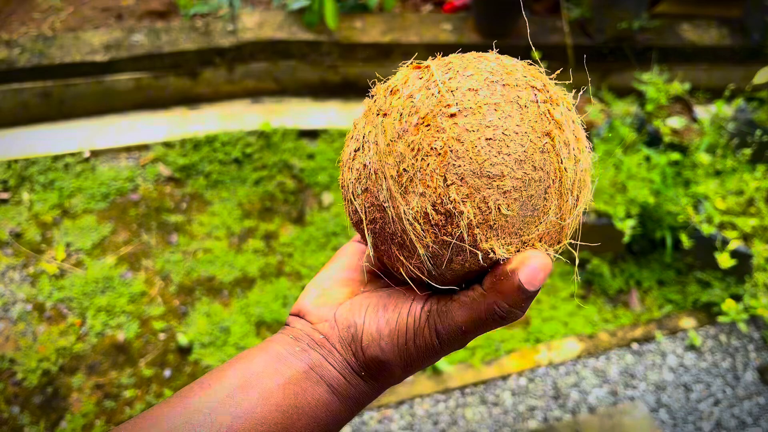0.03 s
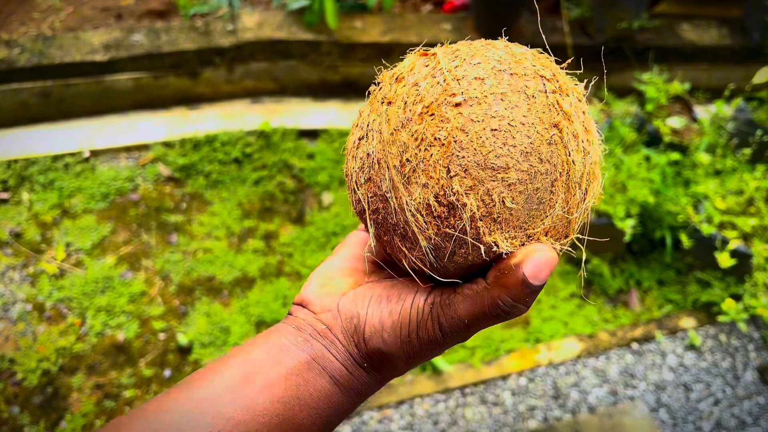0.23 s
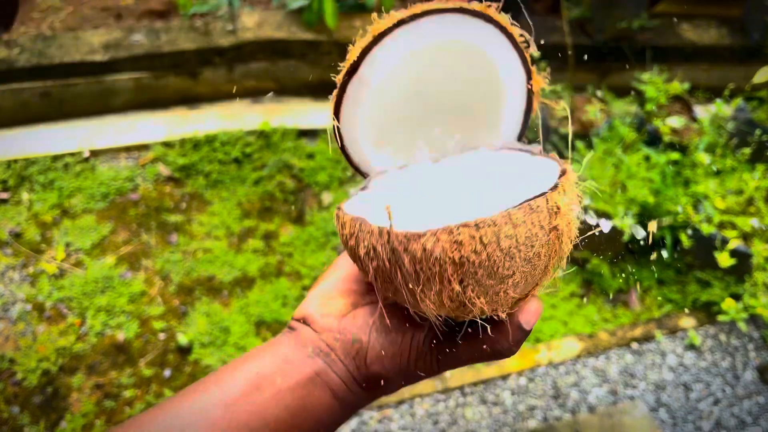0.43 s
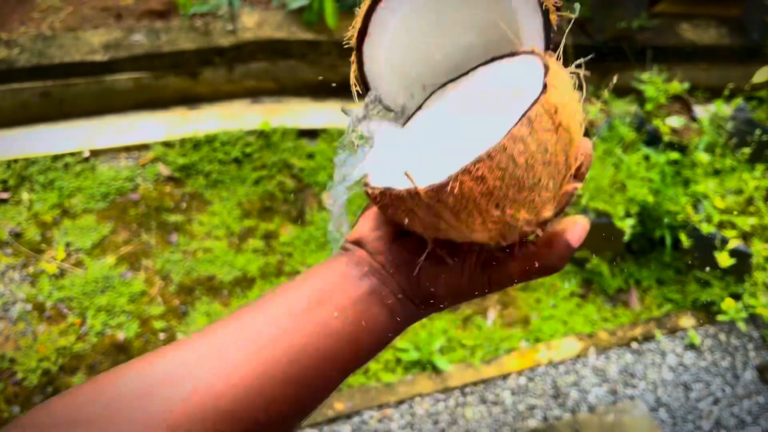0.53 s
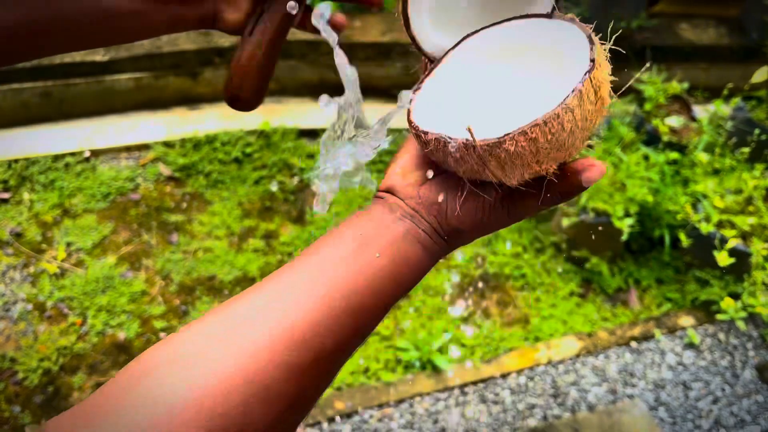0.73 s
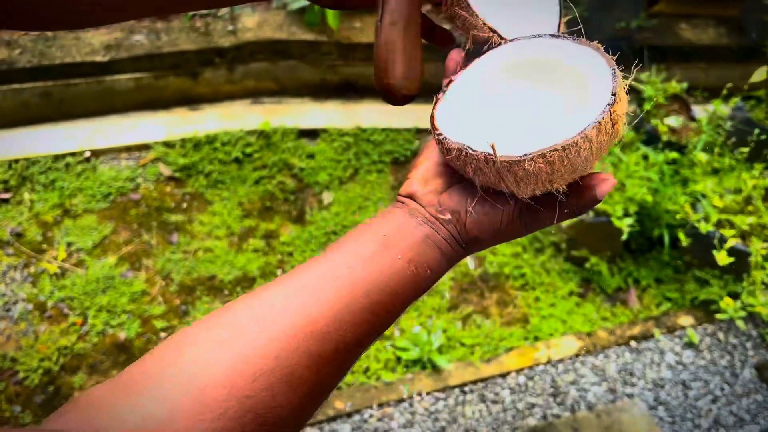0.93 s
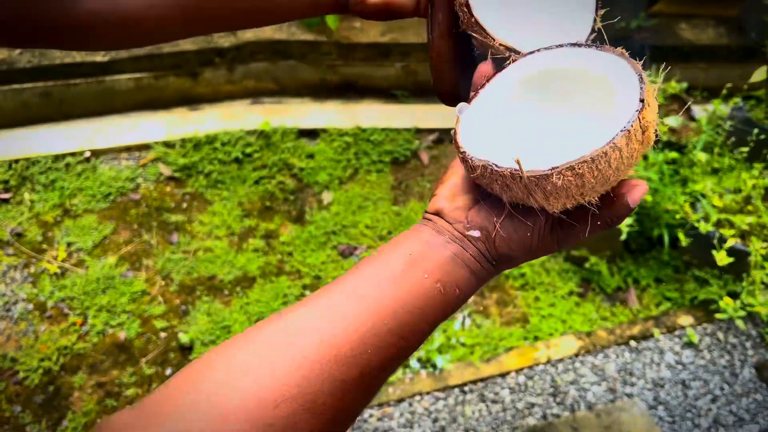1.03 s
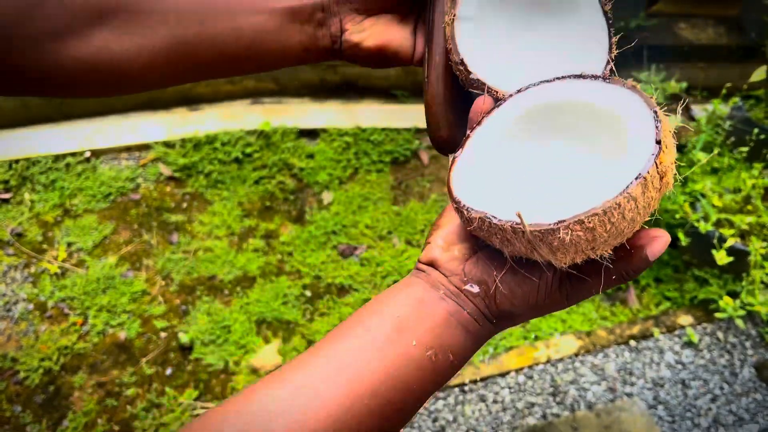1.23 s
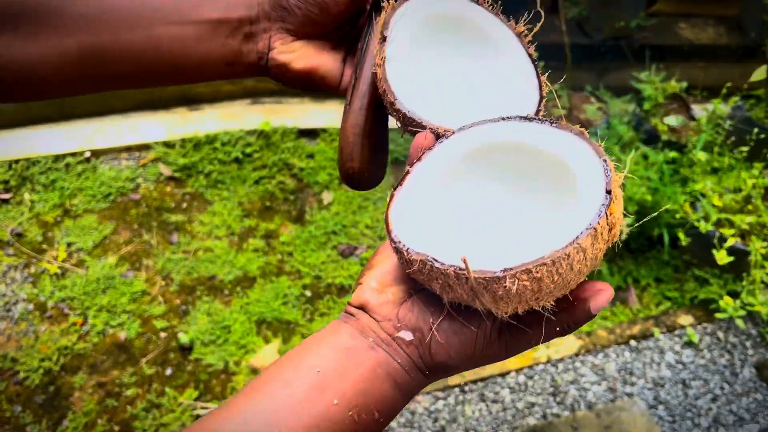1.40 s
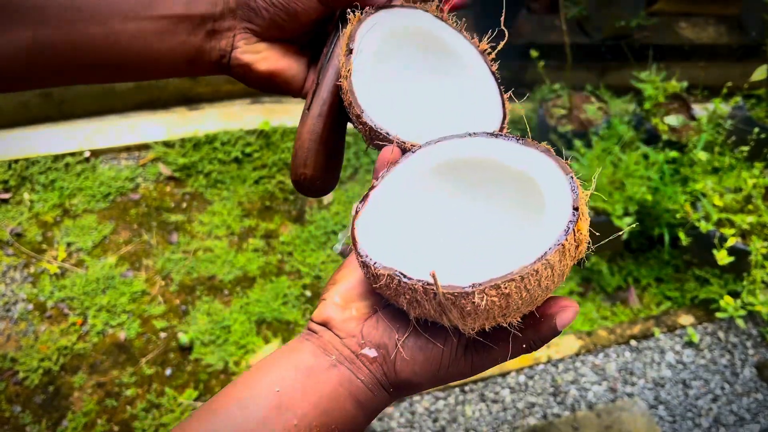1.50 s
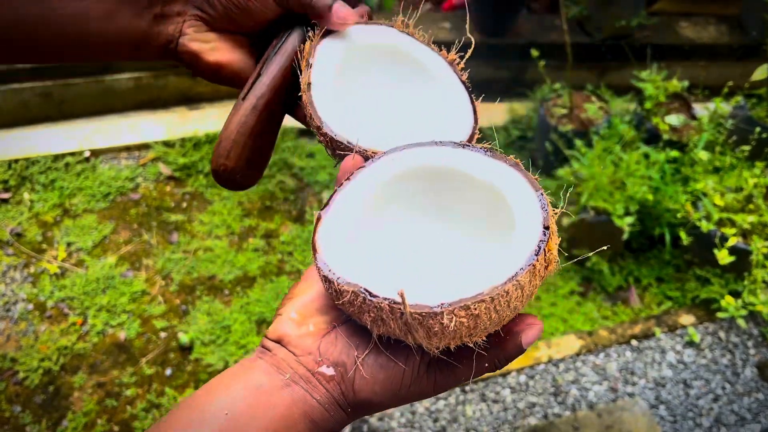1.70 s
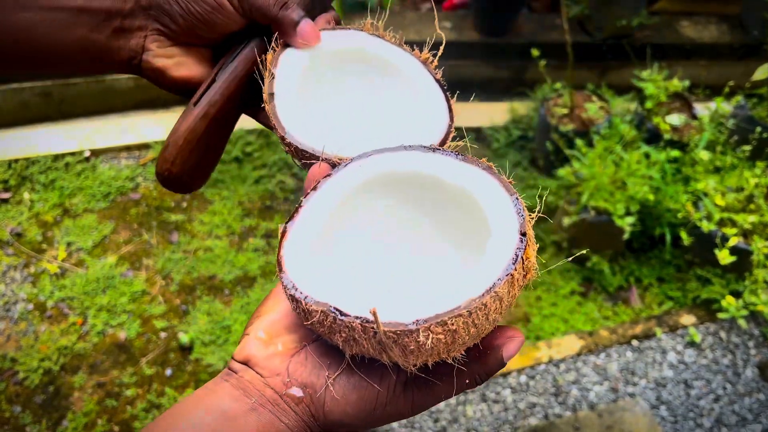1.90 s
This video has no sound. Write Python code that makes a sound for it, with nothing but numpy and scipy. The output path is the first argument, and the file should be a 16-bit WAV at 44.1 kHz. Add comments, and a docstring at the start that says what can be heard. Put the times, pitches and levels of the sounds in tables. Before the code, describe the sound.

Quiet garden air and a faint distant bird slur open the scene. At 0.22 seconds a coconut cracks very loudly: a sharp snap, splintering fibres and a hollow woody thump, with a short outdoor echo. Small wet ticks come at 0.35 to 0.5. Drops start near 0.6, with bright splashes and gurgling blips around 0.9 to 1.1, then sparse drips and soft bird chirps until about 2 seconds.

```python
"""Cracking a coconut in a garden

Over quiet outdoor air, made of filtered noise, a far bird slurs up and down with gliding tones.
A coconut is struck once: short decaying tones snap, rough bursts splinter, and the hollow nut thumps and rings.
The halves part with a few wet ticks, then drops and splashes land, made of short bursts and clouds of clicks.
The garden answers with fading noise, and a close pair of microphone ports hears it all."""
import sys
import numpy as np
from scipy import signal
from scipy.fft import rfft, irfft, next_fast_len
from scipy.io import wavfile
from scipy.ndimage import uniform_filter1d

SR = 44100
rng = np.random.default_rng(int(sys.argv[2]) if len(sys.argv) > 2 else 0)


def waveform_to_disk(signal):
    """Save audio, clipped to [-1, 1], as 16-bit WAV at the path in sys.argv[1]."""
    frames = np.transpose(np.atleast_2d(signal))
    scaled = np.clip(frames, -1, 1) * 32767
    samples = np.round(scaled).astype(np.int16)
    wavfile.write(sys.argv[1], SR, samples)


N = 85995  # length in samples
T, HZ = np.arange(N) / SR, np.fft.rfftfreq(N, 1 / SR)


def amp(db):
    """Turns decibels into gain."""
    return 10 ** (np.asarray(db) / 20)


def unit(x):
    """Scales to rms 1."""
    return x / np.sqrt(np.mean(x ** 2) + 1e-20)


def read(points, hz):
    """Reads a table between its points on a log-frequency axis."""
    f, value = np.transpose(points)
    return np.interp(np.log(hz + 1), np.log(f + 1), value)


def add(mix, s, sound):
    """Mixes a stereo sound in at time s, in seconds."""
    part = mix[:, round(s * SR):][:, :sound.shape[1]]
    part += sound[:, :part.shape[1]]


def convolve(x, taps):
    """Filters channel by channel."""
    return signal.fftconvolve(np.atleast_2d(x), np.atleast_2d(taps), axes=1)[:, :N]


def colour(points, size=2048):
    """Filter taps with the given spectrum that never sound ahead of their input."""
    hz = abs(np.fft.fftfreq(size, 1 / SR))
    log_gain = np.log(amp(read(points, hz)))
    # this phase goes with the gain and puts the energy as early as possible
    spectrum = np.exp(np.conj(signal.hilbert(log_gain)))
    return np.fft.ifft(spectrum).real[:size // 2]


def ports(x, lead_ms, pan_db):
    """A sound reaches the two ports at different times and levels; positive values favour the left."""
    delay = lead_ms / 1000
    size = next_fast_len(len(x) + 4096)
    delays = np.array([[max(-delay, 0)], [max(delay, 0)]])
    late = np.exp(-2j * np.pi * np.fft.rfftfreq(size, 1 / SR) * delays)
    return irfft(rfft(x, size) * late, size)[:, :len(x)] * amp([[pan_db / 2], [-pan_db / 2]])


# How alike surrounding noise is at left and right: f/Hz, likeness (0 to 1)
LEFT_RIGHT_LIKENESS = [(60, 0.259), (280, 0.82), (640, 0.17), (1400, 0), (15000, 0.16)]


def diffuse(points):
    """Noise from all around: the two ports share part of it, by an amount that depends on pitch."""
    a, b = rfft(rng.standard_normal((2, N)))
    same = np.clip(read(LEFT_RIGHT_LIKENESS, HZ), -1, 1)
    pair = np.array([a, same * a + np.sqrt(1 - same ** 2) * b])
    return unit(irfft(pair * amp(read(points, HZ)), N))


def tail(points, t60):
    """Surrounding noise that loses 60 dB in its own time t60 in each band."""
    hz, t, z = signal.stft(diffuse(points), SR, nperseg=256)
    fade = 1000. ** (-t / read(t60, hz)[:, None])
    return signal.istft(z * fade, SR, nperseg=256)[1][:, :N]


def garden(x, t60):
    """Smears a sound into many fading reflections, with the left filter's energy set to 1."""
    taps = tail([(20, 0.003), (20000, 0)], t60) * (1 - np.exp(-T / 0.0044))
    return convolve(x, taps / np.linalg.norm(taps[0]))


def burst(db, hz, width_hz, decay_s, size=4096):
    """Fading random clicks through two equal resonators in a row, which give steep sides."""
    fade = np.exp(-T[:size] / decay_s)
    r = np.exp(-np.pi * width_hz / SR)  # pole radius
    x = rng.choice([-1., 1.], size) * fade
    for _ in range(2):
        x = signal.lfilter([1, 0, -1], [1, -2 * r * np.cos(2 * np.pi * hz / SR), r * r], x)
    return amp(db) * x * np.linalg.norm(fade) / np.linalg.norm(x)


def ragged(x, depth_db):
    """Makes the level flutter in random patches of time and pitch."""
    z = signal.stft(x, SR, nperseg=256)[2]
    patches = rng.standard_normal(z.shape[1:])
    for axis in (0, 1):
        patches = uniform_filter1d(patches, size=5, axis=axis)
    flutter = unit(amp(depth_db * unit(patches)))
    return signal.istft(z * flutter, SR, nperseg=256)[1][:, :N]


# Tone balance of the outdoor air: f/Hz, relative level/dB per Hz
AIR_SPECTRUM = [(20, -20), (50, 2), (90, -6.5), (300, -10.5), (700, -16.5), (1600, -20.5), (4500, -16),
                (5700, -23), (7000, -19.5), (8200, -24.5), (13000, -27.5), (16000, -33)]
# Its overall loudness over time: t/s, level/dB
AIR_LOUDNESS = [(0, -70), (.17, -70.5), (.45, -61.5), (.73, -67), (1.1, -61), (1.4, -65.5), (1.7, -64),
                (1.95, -67)]
AIR_PATCH_DB = 1.8


def air():
    """Quiet outdoor rumble and hiss: shaped noise that is never quite steady."""
    level = amp(np.interp(T, *np.transpose(AIR_LOUDNESS)))
    return ragged(diffuse(AIR_SPECTRUM), AIR_PATCH_DB) * level


# Notes of the far bird, levels before the echo mix: t/s, length/s, start f/Hz, end f/Hz, level/dB
BIRD_NOTES = [(0.123, 0.1136, 5379, 3508, -60), (0.633, 0.0762, 2630, 4991, -61.5),
              (0.749, 0.0767, 5203, 3935, -62.5), (1.205, 0.0774, 5152, 3879, -57),
              (1.483, .08, 2336, 5211, -55.5), (1.594, 0.107, 5300, 3596, -61),
              (1.91, 0.0673, 2289, 4440, -57)]
BIRD_T60_S, BIRD_ROUGH_HZ, BIRD_DIRECT_DB = 0.73, 280, -12


def bird():
    """Quick slurs with a rough pitch, so far off that mostly their echo arrives."""
    out = np.zeros((2, N))
    waver = unit(uniform_filter1d(rng.standard_normal(N), size=24))
    for s, length, start_hz, end_hz, db in BIRD_NOTES:
        u = np.arange(0, 1, 1 / (length * SR))  # progress through the note
        hz = start_hz + (end_hz - start_hz) * u + BIRD_ROUGH_HZ * waver[:len(u)]
        swell = np.sqrt(np.abs(np.sin(np.pi * u)))
        note = amp(db) * swell * np.sin(2 * np.pi * np.cumsum(hz) / SR)
        add(out, s, ports(note, 0, 0))
    echo = garden(out, [(2000, BIRD_T60_S), (6000, BIRD_T60_S)])
    return amp(BIRD_DIRECT_DB) * out + echo


BLOW_T = T[:SR // 2]  # time within each sound of the blow
PUSH_S, PUSH_DB, PUSH_HZ, PUSH_RISE_S = 0.2, -33, 75.04, 0.0061


def push():
    """A soft low push: a deep tone swells and dies around the blow."""
    out, t = np.zeros((2, N)), BLOW_T
    swell = t / PUSH_RISE_S * np.exp(-t / PUSH_RISE_S)
    add(out, PUSH_S, ports(amp(PUSH_DB) * swell * np.sin(2 * np.pi * PUSH_HZ * t), 0, 0))
    return out


# Fractures running through the shell, levels before SNAP_DB:
# t/s, level/dB, f/Hz, decay/s, left lead/ms
FRACTURES = [(.2191, -3, 13000, .00022, -.075), (.2191, -6, 8200, .00018, -.06),
             (.2194, -12.5, 3080, .0022, .03), (.2196, -12, 3900, .0012, .04),
             (.2198, -14, 1500, .0014, .12), (.2199, -15.5, 810, .003, .15), (.2206, -12, 4500, .0005, .05)]
SNAP_DB = -3.5


def snaps():
    """Each fracture is a click with a brief ring: a tone that starts at once and dies fast."""
    out, t = np.zeros((2, N)), BLOW_T
    for s, db, hz, decay, lead in FRACTURES:
        snap = amp(db + SNAP_DB) * np.exp(-t / decay) * np.sin(2 * np.pi * hz * t)
        add(out, s, ports(snap, lead, pan_db=6))
    return out


# Splintering fibres, held back to the first fracture if earlier:
# t/s, level/dB, centre f/Hz, width f/Hz, decay/s
FIBRES = [(0.2208, -23, 15300, 5140, 0.00224), (0.2213, -21, 1580, 4900, 0.00358),
          (0.2156, -20, 2940, 900, .002), (.2196, -21, 720, 230, .004),
          (0.2122, -22.5, 6890, 4500, 0.00095)]


def grit():
    """Fibres splinter around the fractures as short rough bursts."""
    out = np.zeros((2, N))
    for s, db, hz, width, decay in FIBRES:
        add(out, max(s, FRACTURES[0][0]), ports(burst(db, hz, width, decay), 0, 0))
    return out


# Modes of the shell and its cavity, levels before RING_DB: f/Hz, level/dB
SHELL_MODES = [(174, -26), (289, -27), (337, -20), (531, -30), (685, -31), (745, -30), (914, -37),
               (1561, -41), (1991, -43), (2207, -41), (2341, -41), (2731, -42), (3113, -37), (3948, -41)]
RING_S, RING_DB, SHELL_T60_S = .2203, -1, .14
THUMP_LEAD_MS = 0.2  # shared by the ring and the thump


def shell_ring():
    """The shell and its cavity ring together at their own pitches, all dying at one speed."""
    out, t = np.zeros((2, N)), BLOW_T
    ring = sum(amp(db - 60 * t / SHELL_T60_S) * np.sin(2 * np.pi * f * t) for f, db in SHELL_MODES)
    add(out, RING_S, ports(amp(RING_DB) * ring, THUMP_LEAD_MS, -0.7))
    return out


THUMP_S, THUMP_DB, THUMP_RISE_S, THUMP_FALL_S = .2226, 6.5, 0.0014, 0.001742
THUMP_HZ, THUMP_END_HZ, SAG_S = 418.7, 150, 0.0044


def thump():
    """The hollow nut gives way: one heavy swing that sags in pitch."""
    out, t = np.zeros((2, N)), BLOW_T
    hz = THUMP_END_HZ + (THUMP_HZ - THUMP_END_HZ) * np.exp(-t / SAG_S)
    swell = (1 - np.exp(-t / THUMP_RISE_S)) * np.exp(-t / THUMP_FALL_S)
    swing = swell * np.sin(2 * np.pi * np.cumsum(hz) / SR)
    add(out, THUMP_S, ports(amp(THUMP_DB) * swing, THUMP_LEAD_MS, -.6))
    return out


ECHO_MODE_DB, ECHO_MODE_WIDTH_HZ = 8, 30


def shell_colour(x):
    """The echo carries the shell's resonances as peaks in its spectrum."""
    peaks = sum(1 / (1 + (2 * (HZ - hz) / ECHO_MODE_WIDTH_HZ) ** 2) for hz, _ in SHELL_MODES)
    return irfft(rfft(x) * amp(ECHO_MODE_DB * (peaks - np.mean(peaks))), N)


# Tone balance of the garden's first answer: f/Hz, relative level/dB per Hz
NEAR_SPECTRUM = [(30, -13.5), (130, -7), (350, -4.5), (510, 2.5), (590, -13.5), (720, -6.5), (930, -0.5),
                 (1150, -19), (2000, -13.5), (3200, -12.5), (5000, -21.5), (15000, -34)]
# Time it takes to fall 60 dB: f/Hz, t60/s
NEAR_FADE = [(100, 0.12), (14000, 0.18)]
# Tone balance of the garden's late echo: f/Hz, relative level/dB per Hz
FAR_SPECTRUM = [(40, -3.5), (120, -2.5), (260, 0), (450, 4.5), (800, -1), (1200, -15.5), (3000, -13.5),
                (7000, -23.5), (15000, -39.5)]
# Time it takes to fall 60 dB: f/Hz, t60/s
FAR_FADE = [(60, 0.547), (400, 0.3807), (1500, .45), (5000, 0.6), (14000, 0.716)]
NEAR_DB, FAR_DB, ECHO_S, ECHO_PATCH_DB = -25.5, -34.5, .229, 3


def blow_echo():
    """The garden answers the blow with two layers of fading noise that flutter."""
    out = np.zeros((2, N))
    near = amp(NEAR_DB) * tail(NEAR_SPECTRUM, NEAR_FADE)
    far = amp(FAR_DB) * tail(FAR_SPECTRUM, FAR_FADE)
    echo = ragged(shell_colour(near + far), ECHO_PATCH_DB)
    add(out, ECHO_S, echo * (1 - np.exp(-T / .002)))
    return out


# Slaps of the crack off the ground and nearby walls: delay t/s, level/dB, treble cut f/Hz
REFLECTIONS = [(0.0162, -20.5, 4426), (0.0215, -20.5, 3000)]


def wall_slaps(direct):
    """Hard surfaces send back late, weaker and duller copies of the crack."""
    out = np.zeros((2, N))
    for delay, db, cut_hz in REFLECTIONS:
        dull = signal.sosfilt(signal.butter(2, cut_hz, fs=SR, output="sos"), direct)
        add(out, delay, amp(db) * dull)
    return out


THUMP_CUT_HZ = 116.6  # bass below this is weakened


def crack():
    """The shell fractures, the nut rings and thumps, and the surroundings answer."""
    bass_cut = signal.butter(2, THUMP_CUT_HZ, "high", fs=SR, output="sos")
    direct = signal.sosfilt(bass_cut, snaps() + grit() + shell_ring() + thump())
    return push() + direct + blow_echo() + wall_slaps(direct)


# Small knocks and squelches: t/s, level/dB, centre f/Hz, width f/Hz, decay/s
PARTING_KNOCKS = [(0.347, -51, 1360, 303, 0.0092), (.361, -40.5, 7130, 5180, 0.0021),
                  (0.399, -46.5, 1155, 392, 0.00304), (0.4813, -41, 3190, 890, 0.00157),
                  (0.5057, -40.5, 3725, 4730, 0.00232), (0.5049, -42.5, 1790, 1050, 0.00493),
                  (0.505, -51.5, 586.6, 990, 0.0052), (1.743, -54.5, 1188, 914.7, 0.00327)]


def halves():
    """The wet halves knock and squelch as they come apart, in short bursts with a little echo."""
    out = np.zeros((2, N))
    for s, db, hz, width, decay in PARTING_KNOCKS:
        add(out, s, ports(burst(db, hz, width, decay), lead_ms=0.2392, pan_db=6))
    return out + amp(-11.5) * garden(out, [(300, 0.1987), (8000, 0.097)])


WATER_LEAD_MS, WATER_PAN_DB = 0.30746, 4  # the left port leads and is louder
# Single drops landing, levels before DROP_DB: t/s, level/dB
DROP_LANDINGS = [(0.599, -33.5), (0.6867, -46.5), (0.8347, -39.5), (0.8557, -43), (0.8669, -31.5),
                 (0.8859, -30), (0.8912, -38.5), (0.899, -29), (0.9138, -21.5), (0.9352, -28),
                 (0.9525, -30.5), (1.0278, -31), (1.0512, -35), (1.072, -31), (1.0831, -31.5),
                 (1.2095, -40.5), (1.4201, -46.5), (1.4639, -46), (1.4938, -44.5), (1.718, -47.5),
                 (1.8603, -35.5), (1.9464, -42)]
DROP_DB, DROP_HZ, DROP_WIDTH_HZ, DROP_DECAY_S = -7, 6520, 4640, 0.001283
# the sharper tick in each drop, its level relative to the drop's body
TICK_DB, TICK_HZ, TICK_WIDTH_HZ, TICK_DECAY_S = 2, 7801, 28700, 0.000476


def drops():
    """Each stray drop is a bright burst with a sharper tick on top."""
    out = np.zeros((2, N))
    for s, db in DROP_LANDINGS:
        body = burst(db, DROP_HZ, DROP_WIDTH_HZ, DROP_DECAY_S)
        tick = burst(db + TICK_DB, TICK_HZ, TICK_WIDTH_HZ, TICK_DECAY_S)
        add(out, s, ports(amp(DROP_DB) * (body + tick), WATER_LEAD_MS, WATER_PAN_DB))
    return out


SPRAY_PER_S, GURGLE_PER_S, GRAIN_SPREAD_DB = 2000, 700, 4.6  # grain rates are for each of three clouds


def spatter(points, level, per_s):
    """Clouds of tiny impacts of uneven size: one at each port and one that both ports hear."""
    uneven_db = GRAIN_SPREAD_DB * np.minimum(rng.exponential(1, (3, N)), 4)
    size = amp(uneven_db) * rng.choice([-1, 1], (3, N))
    left, right, centre = size * (rng.random((3, N)) < per_s / SR)
    sides = np.array([left, right]) * amp([[.8], [-.8]])
    cloud = sides + ports(centre, WATER_LEAD_MS, WATER_PAN_DB)
    taps = colour(points)
    return convolve(unit(cloud) * level, taps / np.linalg.norm(taps))


# Water hitting the ground: t/s, level/dB, rise/s, decay/s, gurgle level/dB relative to the spray
WATER_HITS = [(0.791, -55, 0.0382, 0.0234, -12), (0.884, -41.5, 0.00464, 0.0177, -12.5),
              (0.913, -41, 0.0034, 0.0271, -1), (1.011, -43.5, 0.0371, 0.0303, -3.5)]
# Tone balance of the bright spray: f/Hz, relative level/dB per Hz
SPRAY_SPECTRUM = [(200, -35.5), (1000, -9), (2500, -35.5), (4500, 4.5), (6400, 5), (8000, 3.5),
                  (10000, 1.5), (13000, -4.5), (16000, -5)]
# Tone balance of the lower gurgle: f/Hz, relative level/dB per Hz
GURGLE_SPECTRUM = [(100, -36), (400, -5.5), (1000, -9), (1500, 1.5), (2150, 4.5), (2700, 6), (3350, 1.5),
                   (4500, 5.5), (8000, -19.5)]


def splashes():
    """Many tiny impacts make a bright spray and a lower gurgle that swell and die together."""
    spray, gurgle = np.zeros(N), np.zeros(N)
    for s, db, rise, decay, gurgle_db in WATER_HITS:
        swell = np.clip((T - s) / rise, 0, 1)
        fade = np.exp(-np.maximum(T - s - rise, 0) / decay)
        level = amp(db) * swell * fade
        spray += level
        gurgle += level * amp(gurgle_db)
    return spatter(SPRAY_SPECTRUM, spray, SPRAY_PER_S) + spatter(GURGLE_SPECTRUM, gurgle, GURGLE_PER_S)


# Heads of the sheets of water: t/s, level/dB, centre f/Hz, width f/Hz, decay/s
SHEET_SLAPS = [(0.9134, -39.5, 890, 2390, 0.0029), (1.0475, -45, 995, 1780, 0.0059)]


def sheet_slaps():
    """The head of each sheet of water slaps the ground as a broad, low burst."""
    out = np.zeros((2, N))
    for s, db, hz, width, decay in SHEET_SLAPS:
        add(out, s, ports(burst(db, hz, width, decay), WATER_LEAD_MS, WATER_PAN_DB))
    return out


# Pockets of air that burst in the splashes: t/s, level/dB, f/Hz
AIR_POCKETS = [(0.916, -45.5, 2740), (.927, -44.5, 1910), (1.028, -39.5, 2716), (1.0344, -40.5, 2507),
               (1.0469, -38, 2762), (1.0528, -40, 2610)]
BUBBLE_WIDTH_HZ, BUBBLE_DECAY_S = 344, 0.001265


def bubbles():
    """Each pocket of air bursts with a short pitched blip from a narrow resonance."""
    out = np.zeros((2, N))
    for s, db, hz in AIR_POCKETS:
        pop = burst(db, hz, BUBBLE_WIDTH_HZ, BUBBLE_DECAY_S)
        add(out, s, ports(pop, WATER_LEAD_MS, WATER_PAN_DB))
    return out


# Time the water's echo takes to fall 60 dB: f/Hz, t60/s
WATER_FADE = [(300, 0.098), (3000, 0.578), (7000, 0.496), (14000, 0.437)]
WATER_WET_DB = -11.5


def water():
    """Stray drops and sheets of coconut water land on the ground, and the garden echoes them."""
    out = drops() + sheet_slaps() + bubbles() + splashes()
    return out + amp(WATER_WET_DB) * garden(out, WATER_FADE)


def scene():
    """All sources together."""
    return crack() + halves() + water() + bird() + air()


# Response of the microphone ports: f/Hz, level/dB
PORT_RESPONSE = [(20, -0.5), (9300, 3.5), (10100, -8), (11000, -2), (11900, 5.5), (16000, 0)]
OVERLOAD, EDGE_HZ = 1, 15900  # amplitude where the soft overload levels off; top of the band


def record(dry):
    """The ports' uneven treble, then soft overload that rounds loud peaks, then the band limit."""
    heard = convolve(dry, colour(PORT_RESPONSE))
    rounded = OVERLOAD * np.tanh(heard / OVERLOAD)
    band_limit = signal.firwin(255, EDGE_HZ, window=("kaiser", 9), fs=SR)
    return signal.oaconvolve(rounded, band_limit[None], "same")


dry = scene()
out = record(dry)
waveform_to_disk(out)
```